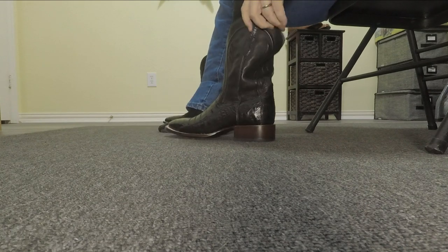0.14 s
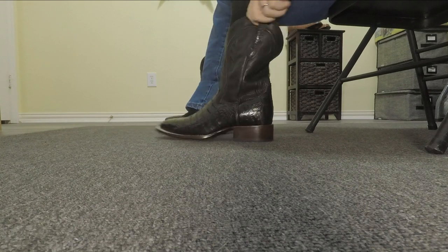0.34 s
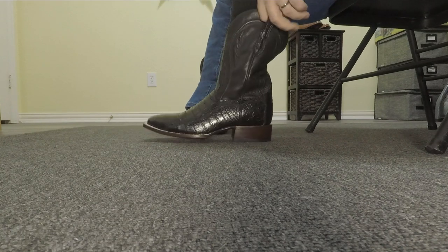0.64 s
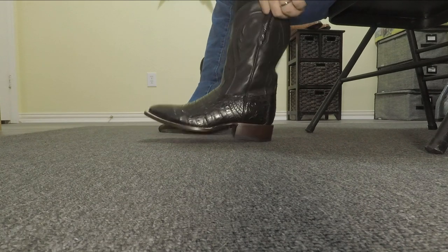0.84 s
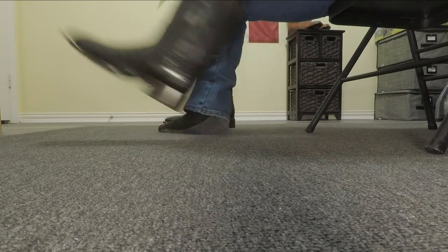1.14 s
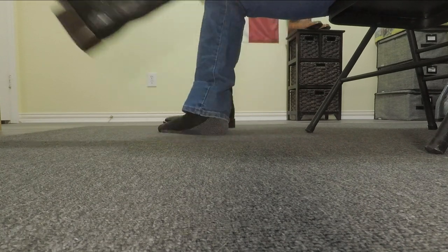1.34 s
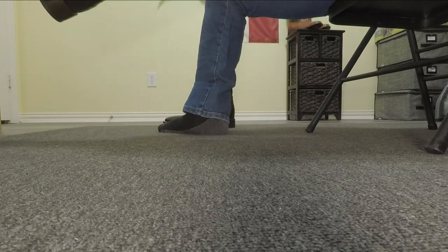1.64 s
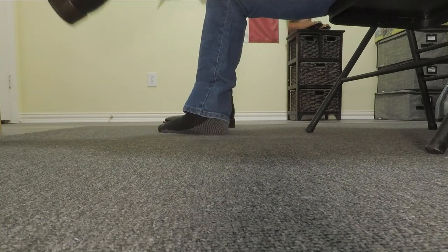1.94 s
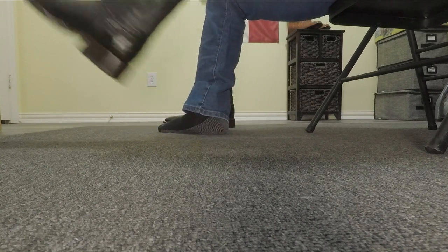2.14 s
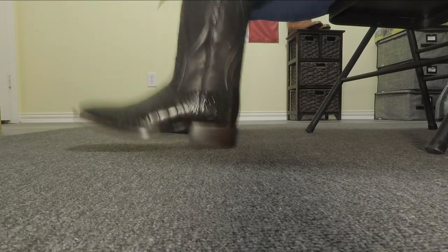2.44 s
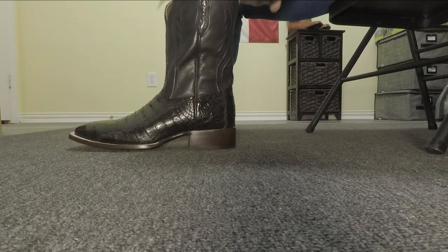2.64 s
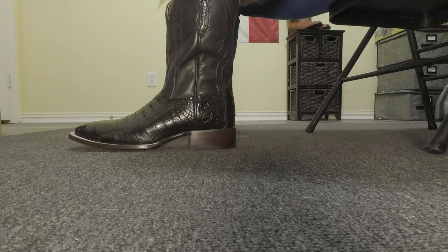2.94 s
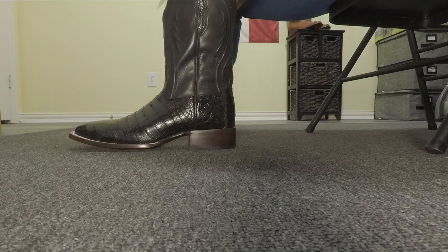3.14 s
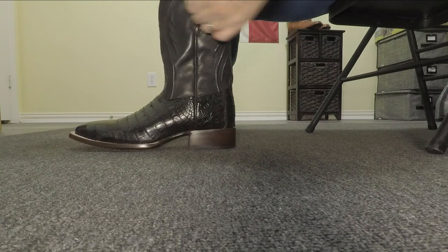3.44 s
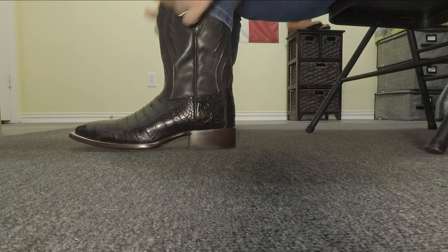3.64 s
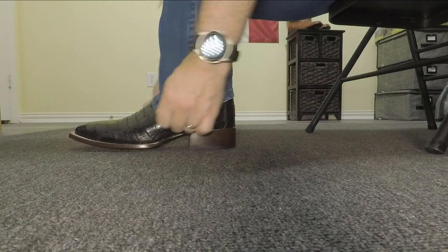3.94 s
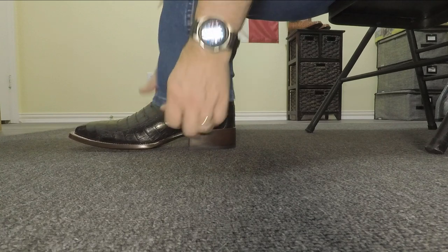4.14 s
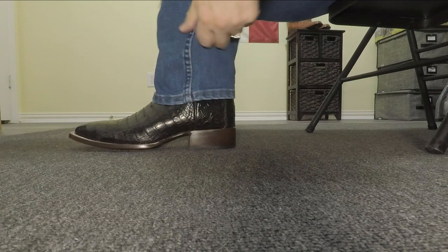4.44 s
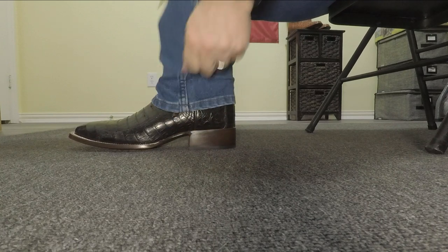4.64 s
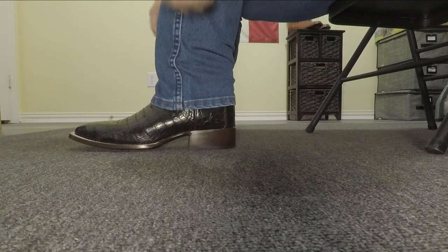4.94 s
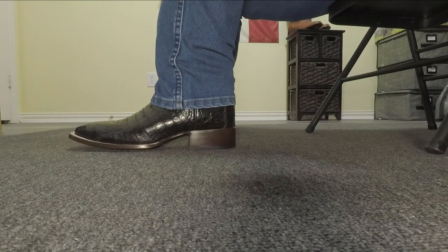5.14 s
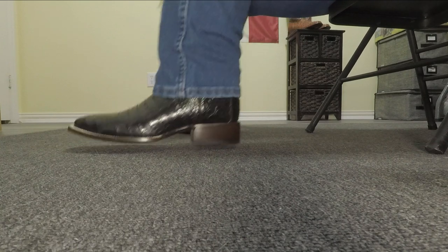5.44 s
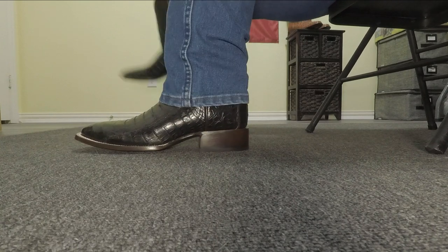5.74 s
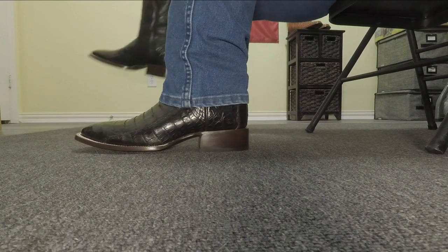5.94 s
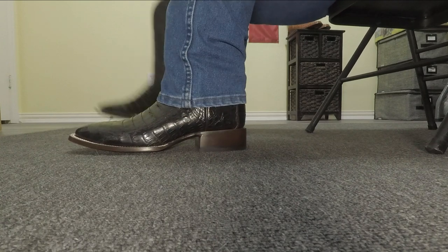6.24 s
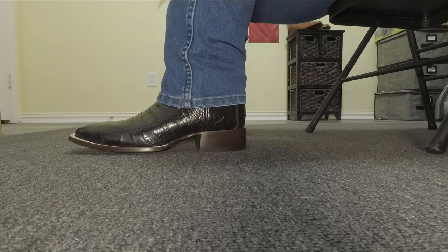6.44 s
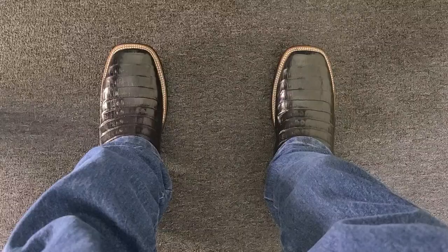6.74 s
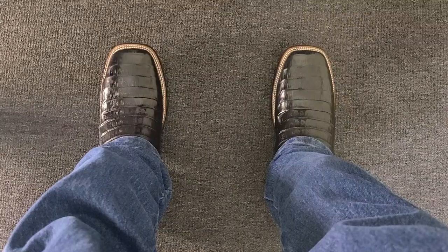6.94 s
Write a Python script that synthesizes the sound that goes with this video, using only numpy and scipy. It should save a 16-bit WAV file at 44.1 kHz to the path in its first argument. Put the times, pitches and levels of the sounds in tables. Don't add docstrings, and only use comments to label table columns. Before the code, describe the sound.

Close to the carpet in a quiet, slightly live room, leather boots are pulled on. Soft knocks and rubbing come first, then a sharp hide slip and a strong double heel thump. Hard pulls follow, with creaking, folding leather and rustling denim. Two further dull heel thumps land as the feet settle, before the sound cuts to a faint low hush.

```python
import sys
import numpy as np
from scipy import signal
from scipy.fft import rfft, irfft, next_fast_len
from scipy.io import wavfile
from scipy.ndimage import map_coordinates

SR = 44100
rng = np.random.default_rng(int(sys.argv[2]) if len(sys.argv) > 2 else 0)


def volts_from_decibels(level):
    exponent = np.asarray(level, float) / 20
    return 10 ** exponent


def store_wav(level_fs):
    pcm = np.round(np.clip(np.atleast_2d(level_fs), -1, 1) * 32767)
    wavfile.write(sys.argv[1], SR, pcm.T.astype(np.int16))


N = 313110

# (frequency [Hz], density [dB per Hz])
MIC_HISS = [(530, -30.5), (900, -0.5), (1080, -9), (2590, -17.5), (3450, -18), (4820, -23.5), (7300, -17),
            (9830, -19), (12500, -26.5), (15400, -57.5)]
MIC_HISS_DB = -53.5

# (peak time [s], level [dB], rise [s], fall [s])
WEIGHT_SHIFTS = [(0.0, -37, .05, 0.023), (0.33, -75, .3, .7), (0.69, -75.5, 0.062, .4), (1.1, -75, .6, 1.5),
                 (1.63, -70, .2, .08), (1.83, -51, .1, .07), (2.05, -68, .2, .2), (2.48, -44.5, .06, 0.5),
                 (2.63, -45, .15, 0.44), (2.92, -51, 0.18, 0.76), (3.29, -54, 0.18, .15),
                 (3.47, -47.5, .1, .1), (3.86, -49, .6, 0.28), (4.43, -61, 0.77, .25), (4.8, -62.5, .8, .2),
                 (5.38, -69.5, 1.7, 0.39), (5.61, -55, 0.092, 0.2), (6.38, -64, .15, 0.25),
                 (6.8, -73, 0.296, .1)]
# (frequency [Hz], density [dB per Hz])
FLOOR_RUMBLE = [(12, -47), (20, -20), (54, -3.5), (65, -4.5), (87, -10), (102, -20), (125, -1.5),
                (160, -32), (280, -120)]

# (peak time [s], force [dB], rise [s], fall [s], tension
# [dB])
LEATHER_STROKES = [(0.0, -24.5, 0.057, 0.055, -5.5), (0.22, -34, 2.1, 0.17, 2),
                   (0.29, -25.5, 0.07, 0.035, -2.5), (0.4, -33, .15, 0.23, -1), (0.51, -36.5, .2, 0.076, -3.5),
                   (0.69, -32.5, 0.026, 0.12, -0.5), (0.88, -34, 0.44, 1, 0), (1.29, -37, 1.4, 1, 6),
                   (1.7, -39, 1.1, .2, -4.5), (1.77, -30, 0.15, .1, 6.5), (1.805, -15, 0.048, 0.079, 0.5),
                   (1.86, -24, 0.13, 0.16, -0.5), (2.084, -35.5, 0.33, 0.5, 0.5),
                   (2.275, -30, 0.046, 0.53, 3.5), (2.455, -34.5, 0.11, 0.065, 1),
                   (2.8, -43.5, 0.17, 0.42, -2.5), (3.31, -32.5, 0.35, 0.92, 1.5),
                  (3.445, -32.5, 0.055, 0.15, -1), (3.755, -23.5, 0.063, 0.26, 6.5),
                  (3.825, -18.5, .06, 0.47, 1.5), (3.93, -20, 0.41, 0.13, -0.5),
                  (4.04, -38, 0.079, 0.22, 1.5), (4.17, -29.5, 0.11, 0.18, -0.5),
                  (4.315, -38.5, 0.012, .15, -0.5), (4.37, -31.5, 0.053, .4, 1),
                  (4.435, -28, 0.036, 0.039, -1), (4.52, -29, 0.09, 0.14, 0.5),
                  (4.585, -28, 0.068, 0.096, 4), (4.64, -22.5, .07, 0.27, 1.5), (4.808, -27, 0.13, 0.2, 0),
                  (5.1, -39, 0.76, 0.23, 0.5), (5.27, -36, 0.056, 0.082, -1.5),
                  (5.35, -32.5, 0.092, 0.33, 0), (5.86, -36, 0.068, 0.22, 1.5), (5.97, -38, 0.66, 1, -0.5),
                  (6.22, -41, 0.92, 0.11, 1.5), (6.55, -38, 0.079, 0.23, 0.5),
                  (6.679, -38, 0.12, 0.072, -3.5), (6.791, -39.5, 0.19, 0.11, -0.5)]
# (peak time [s], speed [dB], rise [s], fall [s], coarseness [dB])
DENIM_SLIDES = [(0.03, -59.5, 0.16, 1.2, 0), (0.35, -64.5, 0.95, 0.25, 4), (0.51, -56.5, 0.27, 0.042, -7),
                (0.82, -59.5, 0.11, 1.5, -2.5), (1.24, -57.5, 1.3, .6, -2), (1.73, -56.5, 0.22, .1, 3.5),
                (1.794, -43.5, 0.07, .08, 0.5), (1.84, -53.5, .05, 0.21, -1), (2.08, -53.5, 0.17, .2, -3),
                (2.35, -63.5, 1.4, 1.7, 0.5), (3.29, -55, 0.2, 0.48, 1), (3.452, -51, 0.013, 0.035, 9),
                (3.6, -57.5, 0.77, 0.43, -5), (3.775, -49, 0.081, 0.56, 0), (3.94, -53, .6, 0.13, 1.5),
                (4.15, -58.5, 0.076, 0.073, 6), (4.34, -64.5, 0.022, 0.27, 8), (4.44, -56.5, 0.18, 0.54, 1),
                (4.635, -48.5, 0.057, 0.28, 1), (4.8, -54.5, 0.12, 0.36, 1), (5.37, -61, 0.16, 0.26, 0.5),
                (5.62, -59.5, .02, .2, 4), (5.9, -68, 0.088, 0.95, 12), (6.12, -67.5, 0.54, 0.18, 5),
                (6.68, -64.5, 0.37, .3, 3.5)]
# (peak time [s], level [dB], rise [s], fall [s])
SHAFT_FOLDS = [
    (2.27, -45.5, 0.047, 0.35),
    (3.765, -38.5, 0.034, 0.21),
    (3.9, -52, 0.25, 0.16),
    (4.32, -50, 0.0099, 0.17),
    (4.433, -42.5, 0.012, .04),
    (4.5, -44.5, 0.1, 0.25),
    (0.505, -51.5, .2, 0.047),
    (3.3, -52.5, 0.26, .3),
    (0.92, -52.5, .4, 0.72),
]
# (frequency [Hz], width [Hz], level [dB])
SHAFT_MODES = [(163, 25.4, -1), (212.4, 13, 3.5), (240, 27.7, -1), (328.2, 21.6, 0)]
# (frequency [Hz], width [Hz], level [dB])
SLACK_MODES = [(363.5, 71, -4.5), (471, 44.6, 0.5), (513.2, 14.2, 1)]
# (frequency [Hz], width [Hz], level [dB])
TAUT_MODES = [(572, 44, 1.5), (624.6, 30, 3), (699.7, 40, 5), (786, 250, -5)]
# (frequency [Hz], density [dB per Hz])
CREAK_SPECTRUM = [(800, -27), (1000, 6), (1100, 5), (1250, 1.5), (1600, -2.5), (1900, -14.5), (2400, -26),
                  (4000, -88.5)]
# (frequency [Hz], density [dB per Hz])
SCUFF_SPECTRUM = [(1000, -48.5), (1700, -0.5), (2380, -7), (2840, -11), (3230, -5.5), (4190, -15),
                  (5000, -15), (6500, -41), (11000, -120)]
# (frequency [Hz], density [dB per Hz])
DENIM_SPECTRUM = [(2240, -10.5), (3800, -9), (4810, -11), (5830, -4.5), (9000, -8), (11300, -15.5),
                  (13300, -19.5), (14100, -20.5), (15400, -49)]
LEATHER_REST_DB, DENIM_REST_DB, FLOOR_REST_DB = -50.5, -76, -81
SHAFT_DB, SLACK_DB, TAUT_DB, CREAK_DB = -4.5, -5.5, -6, -6.5
SHAFT_PER_TENSION, SLACK_PER_TENSION, TAUT_PER_TENSION = -1.27, 0.09, 0.89
SLACK_NARROW = -0.56
CREAK_FROM_SLIDE = 0.49

# (time [s], swing [dB], click [dB], pitch [Hz], swing length [cycles])
SOFT_KNOCKS = [(0.031, -26, -50, 760, 5.3), (0.264, -23.5, -52, 674, 3.1), (0.282, -17, -69, 212, 4),
               (0.319, -24, -53, 199, 9.5), (0.414, -25.5, -53, 497, 7.1), (0.678, -21.5, -60, 188, 3.1),
               (0.678, -30, -60, 480, 5), (1.559, -30, -57.5, 322, 9), (1.695, -25, -54, 623, 4),
               (2.025, -28.5, -44.5, 586, 9.7), (2.093, -33.5, -50, 566, 3.5), (2.363, -23.5, -60, 605, 22),
               (2.893, -28, -57, 198, 6.7), (3.675, -30, -48, 560, 5.2), (3.787, -14.5, -41, 500, 8.8),
               (3.986, -20, -48.5, 488, 6.4), (4.168, -20.5, -51.5, 610, 5.3), (4.311, -28, -40, 584, 8.7),
               (4.337, -28, -32, 590, 7.8), (4.428, -18, -48, 614, 4.7), (4.432, -19.5, -48, 870, 7.2),
               (4.316, -38.5, -48, 1140, 2.9), (4.435, -18.5, -43, 221, 3.7), (4.445, -16, -53, 628, 4),
               (4.585, -20, -43, 546, 8.3), (5.864, -29, -41, 493, 8.8), (6.629, -32, -56, 630, 19)]
# (time [s], peak level [dB], pitch [Hz], swing length [cycles])
HIDE_SLIPS = [(0.369, -26.5, 611, 4.8), (0.505, -32, 308, 4.3), (1.116, -28, 686, 8.2),
              (1.237, -26, 743, 6), (1.738, -22, 589, 6), (1.78, -14.5, 610, 7.9), (1.799, -7.5, 340, 6),
              (1.833, -15.5, 479, 7.8), (1.861, -19, 437, 6), (2.258, -27.5, 610, 6), (2.278, -23, 646, 6),
              (2.297, -20, 630, 6), (2.309, -24.5, 657, 6), (2.337, -21, 605, 6), (3.383, -25, 590, 6),
              (3.44, -22.5, 514, 6), (3.608, -28, 503, 6), (3.711, -22.5, 590, 6), (3.729, -14.5, 509, 6.5),
              (3.751, -15, 501, 7.4), (3.806, -10.5, 536, 6), (3.82, -10, 482, 6), (3.835, -13, 751, 6.6),
              (3.857, -11, 670, 6), (3.87, -7.5, 527, 6), (3.887, -10, 580, 6), (3.907, -11, 586, 6),
              (3.937, -11.5, 310, 6), (3.962, -15, 759, 5.4), (4.112, -26, 471, 6), (4.366, -21, 406, 6.8),
              (4.463, -22.5, 589, 6.7), (4.502, -19.5, 340, 6), (4.557, -23.5, 608, 6),
              (4.625, -17, 510, 5.6), (4.647, -18, 382, 5.4), (4.683, -18, 600, 5.5),
              (4.797, -18, 456, 8.3), (4.844, -20, 357, 6), (5.028, -30, 630, 6), (5.343, -24.5, 611, 8.2),
              (6.542, -29, 503, 6)]
# (time [s], click [dB], swing [dB], pitch [Hz], swing length [cycles])
HEEL_BLOWS = [(1.6011, -34.5, -13.5, 600, 4.5), (1.601, -57, -15, 199, 4.3), (2.463, -62, -19.5, 157, 14),
              (2.4787, -21.5, -4, 232, 1.97), (2.5214, -28.5, -1, 196.4, 2.55), (2.521, -49, -21.5, 983, 4),
              (3.4547, -43.5, -23.5, 212, 5.9), (5.5915, -33, -14.5, 164.4, 25),
              (5.5974, -19, -7.5, 219, 3.3), (6.3637, -37, -31, 405, 2.8), (6.3662, -59, -15, 380, 6),
              (6.366, -59, -6, 203.3, 3.5), (6.377, -50, -17, 270, 4.3), (6.393, -56, -18.5, 261, 6),
              (6.411, -52, -18.5, 332, 2.7), (5.614, -36, -20, 302, 4.7)]
# (time [s], level [dB], pitch [Hz])
EDGE_TICKS = [(1.601, -50, 6000), (2.026, -46, 2600), (2.479, -41, 6500), (2.5222, -30, 1400),
              (3.4551, -44, 3600), (3.4555, -52, 7000), (4.338, -41, 2300), (4.347, -45, 2000),
              (4.316, -42, 1500), (5.5976, -46, 5500), (6.3642, -33, 1300)]
# (frequency [Hz], width [Hz], level [dB])
EDGE_MODES = [(1042, 480, 2.5), (2060, 750, -1.5), (3470, 1300, -8)]
# (frequency [Hz], t60 [s])
ROOM_T60 = [(100, 0.12), (260, 0.65), (700, 0.54), (1840, 0.52), (4850, 0.72)]
# (frequency [Hz], level [dB])
ROOM_SHARE = [(150, -17.5), (400, 0.5), (800, -3), (1500, -5.5), (3500, -8), (6000, 10)]
HEEL_ROOM_DB, KNOCK_ROOM_DB = 1.5, -3
HEEL_RISE_S, KNOCK_RISE_S, SLIP_RISE_S = .0035, .002, .0016
SOFT_CLICK_MAX_DB, SLIP_DB = -33, -3
EDGE_HZ, EDGE_OCT_PER_DB = 3040, 0.04
ROOM_BUILD_S = .006

# (frequency [Hz], level [dB])
PORT_LEVEL = [(40, -1), (200, -1.7), (380, -4.5), (550, -9.5), (700, -15), (900, -7), (1290, -1.5),
              (2380, -.5), (3200, -3), (4400, -5.5), (5500, -8), (8100, -8), (11000, -6), (15000, -3.5)]
# (frequency [Hz], lead [rad])
PORT_PHASE = [(30, 0), (200, -.1), (450, -.28), (600, 0), (750, 1.55), (1250, 1.9), (2100, 1.5), (2900, .1),
              (4300, 0), (15000, 0)]
# (frequency [Hz], share [0-1])
PORT_LIKENESS = [(100, .997), (400, .99), (1500, .95), (2200, .75), (2900, .4), (3700, .55), (5000, .1),
                 (6200, .72), (14000, .7)]
LOW_CUT_HZ, LOW_CUT_ORDER = 136, 26

# (frequency [Hz], density [dB per Hz])
LAST_HUSH = [(15, -50), (40, -12), (85, 0), (157, -8), (340, -13), (420, -10), (510, -20), (2000, -27),
             (12000, -32), (15650, -35), (15800, -80)]
LAST_HUSH_DB, SCENE_CHANGE_S = -78, 6.803


def unit(x):
    return x / np.sqrt(np.mean(x ** 2) + 1e-20)


def along(points, hz):
    f, v = np.transpose(points)
    return np.interp(np.log(hz + 1), np.log(f + 1), v)


def wobble(rate):
    knots = rng.standard_normal(int(N * rate / SR) + 4)
    return map_coordinates(knots, [np.arange(N) * rate / SR])


def filtered(x, response):
    n = x.shape[-1]
    m = next_fast_len(n + 8192)
    return irfft(rfft(x, m) * response(np.fft.rfftfreq(m, 1 / SR)), m)[..., :n]


def colour(spectrum):
    return lambda hz: volts_from_decibels(along(spectrum, hz))


def modes(table):
    def response(f):
        total = 0
        for k, (centre, width, db) in enumerate(table):
            damping = 1j * f * width
            total = total + (-1) ** k * volts_from_decibels(db) * damping / (centre ** 2 - f ** 2 + damping)
        return total
    return response


def body(table, top_hz):
    return lambda hz: modes(table)(hz) / (1 + (hz / top_hz) ** 4)


def strokes(rows, rest_db):
    s, db, rise, fall, *quality = np.transpose(rows)[..., None]
    t = np.arange(0, N / SR, .001)
    power = volts_from_decibels(2 * db - 40 * np.maximum((s - t) / rise, (t - s) / fall))
    total = power.sum(0) + volts_from_decibels(2 * rest_db)
    curves = [10 * np.log10(total)]
    curves += [(q * power).sum(0) / total for q in quality]
    return [np.interp(np.arange(N) / SR, t, curve) for curve in curves]


def friction(response, slips, share, spread_db, flutter_db):
    noise = rng.standard_normal((2, N))
    at = rng.integers(0, 2 * N, int(2 * N * slips / SR))
    excess = np.minimum(rng.exponential(size=len(at)), 4)
    sizes = volts_from_decibels(spread_db * excess) * rng.standard_normal(len(at))
    jerks = np.bincount(at, sizes, 2 * N).reshape(2, N)
    force = np.sqrt(1 - share) * noise + np.sqrt(share) * unit(jerks)
    return unit(filtered(force * volts_from_decibels(flutter_db * wobble(25)), response))


def microphone_hiss():
    noise = rng.standard_normal((2, N))
    return volts_from_decibels(MIC_HISS_DB - 4) * unit(filtered(noise, colour(MIC_HISS)))


def floor_rumble():
    level_db = strokes(WEIGHT_SHIFTS, FLOOR_REST_DB)[0]
    return volts_from_decibels(level_db) * friction(colour(FLOOR_RUMBLE), 13, share=0.37, spread_db=-2, flutter_db=-1.5)


def leather_and_denim():
    force_db, tension = strokes(LEATHER_STROKES, LEATHER_REST_DB)
    hiss_db, coarse = strokes(DENIM_SLIDES, DENIM_REST_DB)
    fold_db = strokes(SHAFT_FOLDS, -88)[0]
    scuff_db = hiss_db + coarse
    shaft_db = force_db + SHAFT_DB + SHAFT_PER_TENSION * tension
    slack_db = force_db + SLACK_DB + SLACK_PER_TENSION * tension + SLACK_NARROW * abs(tension)
    taut_db = force_db + TAUT_DB + TAUT_PER_TENSION * tension
    creak_db = CREAK_DB + CREAK_FROM_SLIDE * scuff_db + (1 - CREAK_FROM_SLIDE) * taut_db

    shaft = friction(body(SHAFT_MODES, top_hz=460), 68, share=0.24, spread_db=1, flutter_db=1.5)
    slack = friction(body(SLACK_MODES, top_hz=700), 150, share=0.12, spread_db=3, flutter_db=0)
    taut = friction(body(TAUT_MODES, top_hz=990), 150, share=0.19, spread_db=1, flutter_db=1)
    creak = friction(colour(CREAK_SPECTRUM), 300, share=0.2, spread_db=2.5, flutter_db=0.6)
    scuff = friction(colour(SCUFF_SPECTRUM), 1100, share=0.18, spread_db=0, flutter_db=1)
    hiss = friction(colour(DENIM_SPECTRUM), 2100, share=0.064, spread_db=5.5, flutter_db=2)

    leather = volts_from_decibels(shaft_db) * shaft + volts_from_decibels(slack_db) * slack + volts_from_decibels(taut_db) * taut
    leather += np.hypot(volts_from_decibels(creak_db), volts_from_decibels(fold_db)) * creak
    return leather + volts_from_decibels(scuff_db) * scuff + volts_from_decibels(hiss_db) * hiss


def heel_edge(size):
    carpet = signal.butter(9, 3600, fs=SR, output="sos")
    edge = signal.sosfilt(carpet, filtered(np.eye(1, size)[0], modes(EDGE_MODES)))
    return edge / np.abs(edge).max()


def direct_blow(edge, click_db, swing_db, hz, cycles, rise):
    t = np.arange(len(edge)) / SR
    turn = 2 * np.pi * hz * t
    swing = np.sin(turn) + 0.23 * (hz < 400) * np.sin(2.57 * turn)
    swing *= volts_from_decibels(-60 * t * hz / cycles) * (1 - np.exp(-t / rise)) ** 1.72
    swing *= np.cos(np.pi / 2 * t / t[-1])
    corner_hz = EDGE_HZ * 2 ** (EDGE_OCT_PER_DB * max(click_db + 26.5, -10))
    click = filtered(edge, lambda f: 1 / (1 + 1j * f / corner_hz))
    return volts_from_decibels(swing_db + 1.5) * swing / np.abs(swing).max() + volts_from_decibels(click_db + 11) * click


def room_tail(size):
    hz, t, z = signal.stft(rng.standard_normal((2, size)), SR, nperseg=256)
    fade = volts_from_decibels(-60 * t / along(ROOM_T60, hz)[:, None])
    fade = fade * (1 + 0.4 * volts_from_decibels(-60 * t / 0.036))
    fade = fade * (1 - np.exp(-(t + 0.0026) / ROOM_BUILD_S))
    wet = volts_from_decibels(along(ROOM_SHARE, hz))[:, None]
    tail = signal.istft(z * fade * wet, SR, nperseg=256)[1][:, :size]
    return tail / np.sqrt(size * np.mean(fade ** 2))


def knocks_and_heels():
    tail_size, short = SR * 2 // 5, SR // 20
    out = np.zeros((2, N + SR))
    edge = heel_edge(short)
    blows = [row + (HEEL_ROOM_DB, HEEL_RISE_S) for row in HEEL_BLOWS]
    for s, swing_db, click_db, hz, cycles in SOFT_KNOCKS:
        soft_click_db = min(click_db, SOFT_CLICK_MAX_DB) - 10
        blows.append((s + 0.00098, soft_click_db, swing_db, hz, cycles, KNOCK_ROOM_DB, KNOCK_RISE_S))
    for s, db, hz, cycles in HIDE_SLIPS:
        blows.append((s, db - 45, db + SLIP_DB, hz, cycles, None, SLIP_RISE_S))

    for s, click_db, swing_db, hz, cycles, room_db, rise in blows:
        direct = direct_blow(edge, click_db, swing_db, hz, cycles, rise)
        out[:, round(s * SR):][:, :short] += direct * [[1], [.3]]
        if room_db is None:
            continue
        answer = volts_from_decibels(room_db + 3.5) * signal.fftconvolve(direct[None], room_tail(tail_size), axes=1)
        out[:, round((s + .004) * SR):][:, :answer.shape[1]] += answer

    t = np.arange(short) / SR
    for s, db, hz in EDGE_TICKS:
        two_cycles = np.sin(np.pi * np.minimum(t * hz / 2, 1)) ** 2
        out[0, round(s * SR):][:short] += volts_from_decibels(db) * np.sin(2 * np.pi * hz * t) * two_cycles
    return out[:, :N]


def microphone_ports(pair):
    def alike(hz):
        return np.clip(along(PORT_LIKENESS, hz), 0, 1)

    def left(hz):
        return volts_from_decibels(along(PORT_LEVEL, hz)) * np.exp(1j * along(PORT_PHASE, hz))

    def mean(hz):
        return np.sqrt(1 + abs(left(hz)) ** 2 + 2 * alike(hz) * left(hz).real) / 2

    shared = filtered(pair[0], lambda hz: np.array([alike(hz) * left(hz), 1 + 0 * hz]) / mean(hz))
    own = filtered(pair[1], lambda hz: np.sqrt(1 - alike(hz) ** 2) * abs(left(hz)) / mean(hz))
    return shared + own * [[1], [0]]


def last_hush():
    return volts_from_decibels(LAST_HUSH_DB) * unit(filtered(rng.standard_normal(N), colour(LAST_HUSH)))


def scene():
    def low_cut(hz):
        return 1 / (1 + (LOW_CUT_HZ / (hz + 1)) ** LOW_CUT_ORDER)

    noise_floor = microphone_hiss() + floor_rumble()
    boots = filtered(leather_and_denim() + knocks_and_heels(), low_cut)
    first_shot = np.clip((SCENE_CHANGE_S - np.arange(N) / SR) / .004, 0, 1)
    return first_shot * microphone_ports(boots + noise_floor) + last_hush()


def band_limit(x):
    return signal.sosfilt(signal.butter(12, 15600, fs=SR, output="sos"), x)


def record(dry):
    rounded = dry / (1 + np.abs(dry / 1.02) ** 6) ** (1 / 6)
    return band_limit(rounded)


dry = scene()
out = record(dry)
store_wav(out)
```